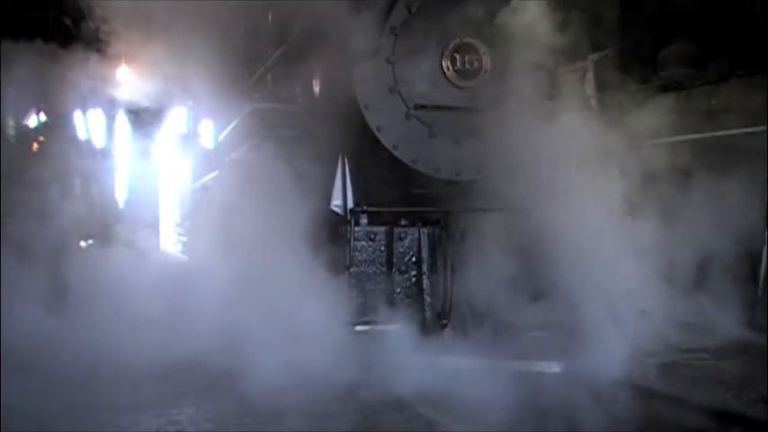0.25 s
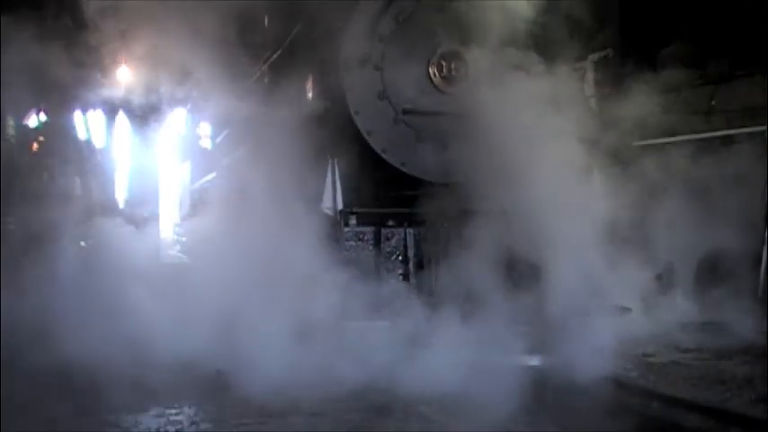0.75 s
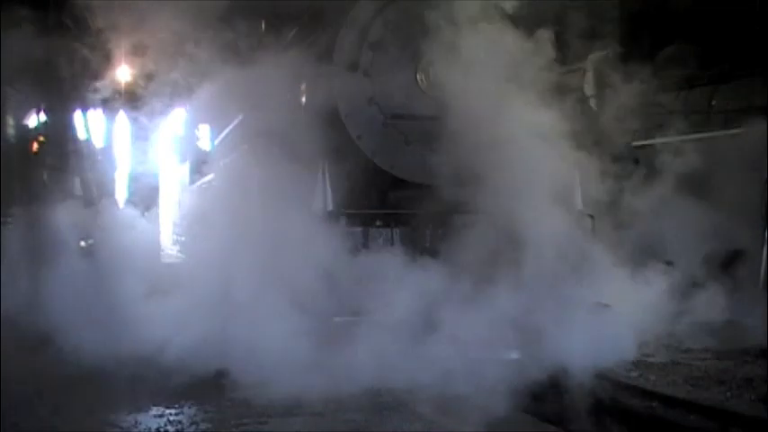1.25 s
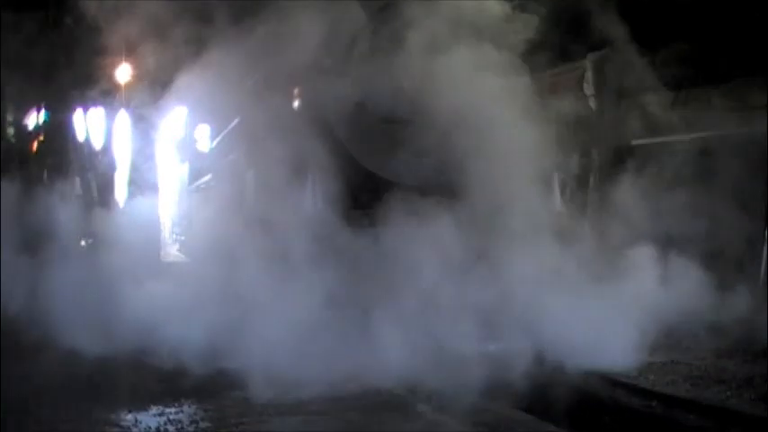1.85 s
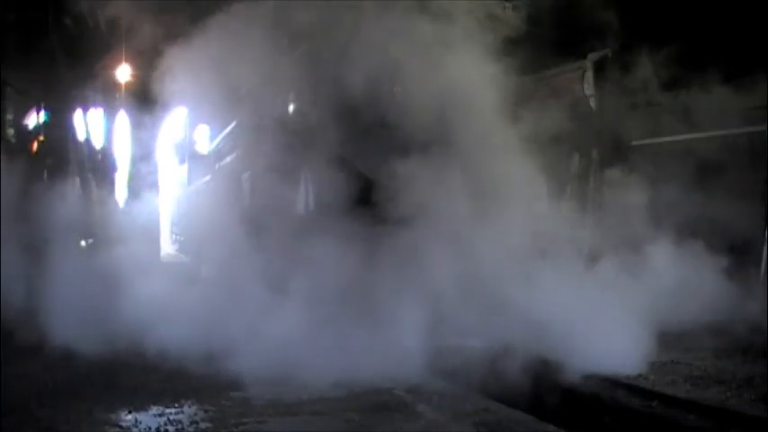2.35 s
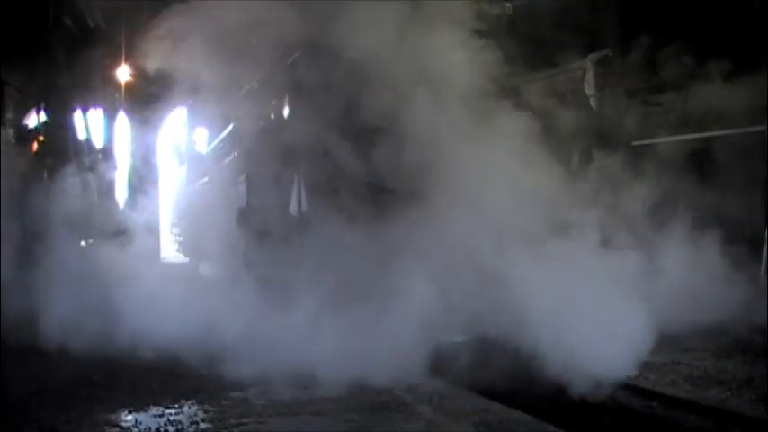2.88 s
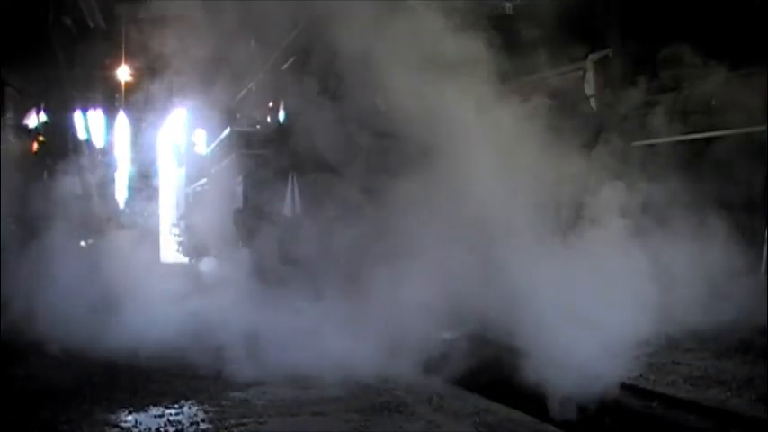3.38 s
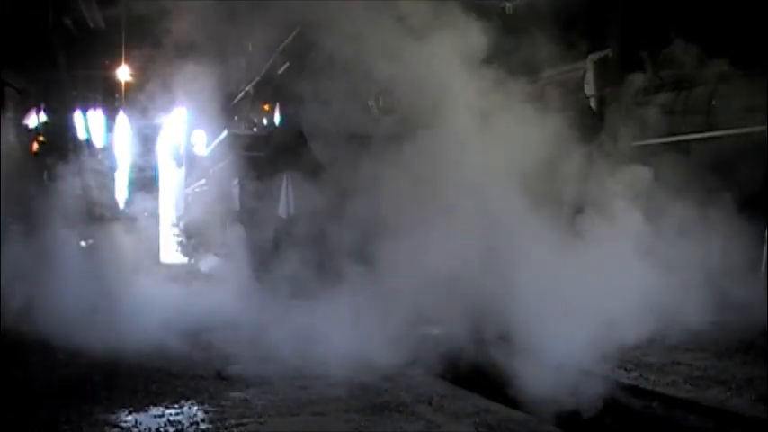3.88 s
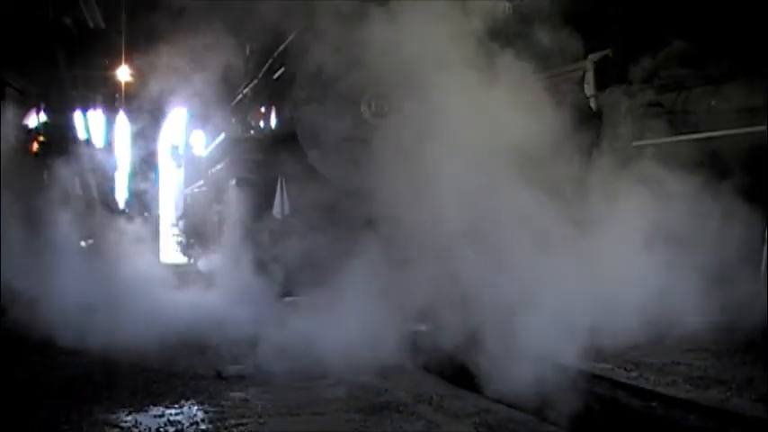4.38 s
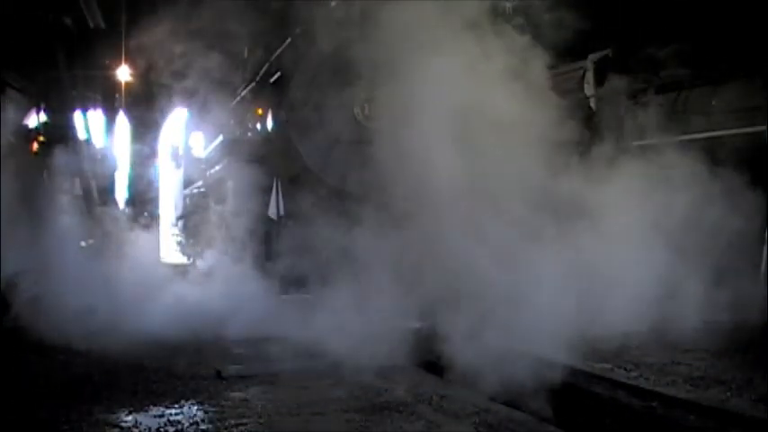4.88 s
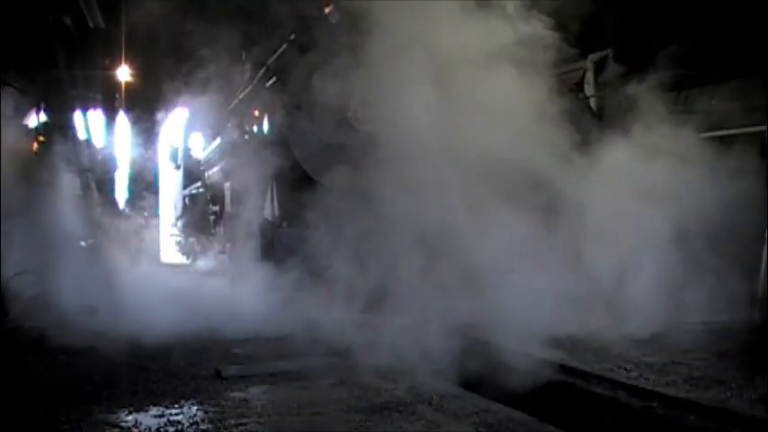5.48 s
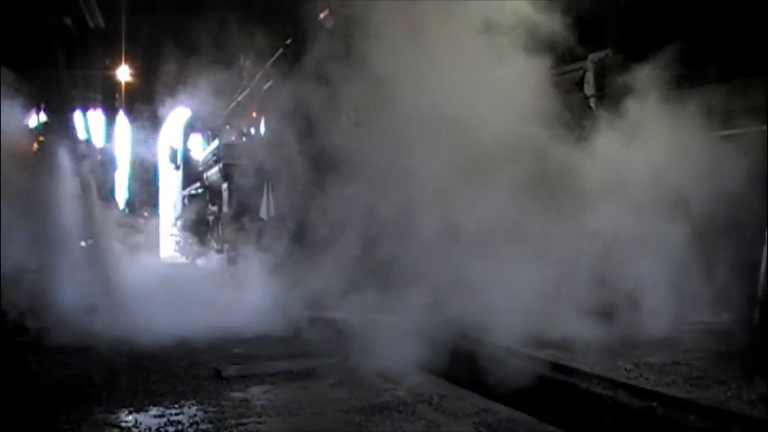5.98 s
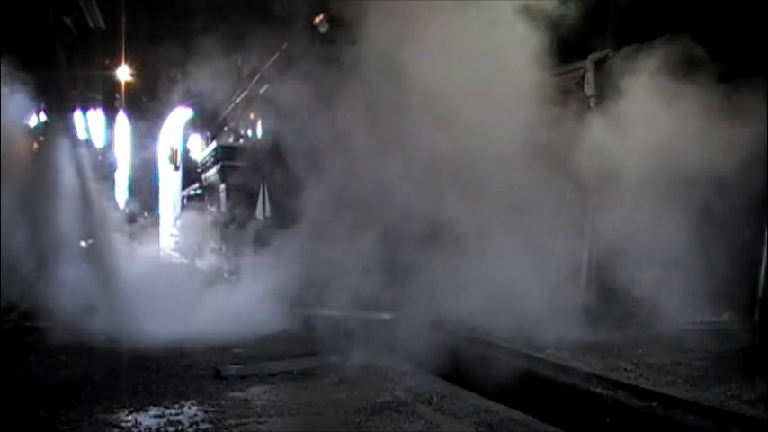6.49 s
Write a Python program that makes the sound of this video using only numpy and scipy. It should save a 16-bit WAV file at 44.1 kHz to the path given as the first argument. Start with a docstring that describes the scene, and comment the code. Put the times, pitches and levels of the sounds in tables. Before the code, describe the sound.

Loud steam hisses from a locomotive in a large hall, its rough squeal falling in pitch before the jet weakens and steel clinks twice.

```python
"""A steam locomotive blows off steam in a large engine hall. Its turbulent low roar narrows suddenly to
a bright jet, which feeds back on itself in a screech that slides down as the pressure falls.
Faint breathy tones come and go. The jet dies away over the hollow hum of a far draught, then
the roar swells a little. A soft thud sounds midway and a steel part clinks twice at the end."""
import sys
import numpy as np
from scipy import signal
from scipy.fft import rfft, irfft, next_fast_len
from scipy.io import wavfile
from scipy.ndimage import uniform_filter1d, map_coordinates

SR = 44100
rng = np.random.default_rng(int(sys.argv[2]) if len(sys.argv) > 2 else 0)


def dump(signal):
    """Clip the signal to [-1, 1] and save it as 16-bit WAV at the path in sys.argv[1]."""
    limited = np.clip(np.atleast_2d(signal).T, -1, 1)
    pcm = np.round(limited * 32767).astype(np.int16)
    wavfile.write(sys.argv[1], SR, pcm)


N = 297221

# Fader moves of the far draught. Each row: time in seconds, hum in dB, rumble in dB.
DRAUGHT_LEVELS = [(0.0, -27, -56), (0.38, -31.5, -56), (0.55, -55, -73), (1.3, -59, -77), (2.1, -44, -61),
                  (2.9, -42, -70), (3.4, -35, -60), (3.7, -32, -53), (4.7, -36.5, -57.5), (5.1, -34, -58.5),
                  (5.5, -32, -57), (5.9, -34.5, -59), (6.74, -32.5, -61)]
# Tone colours of the draught's two layers. Each row: frequency in Hz, level in dB.
HUM_EQ = [(100, -40), (170, -23), (250, -8.5), (400, -7.5), (555, -3), (580, -1), (606, 7.5), (640, -7),
          (685, 4.5), (745, -5.5), (1400, -12.5), (2500, -50)]
RUMBLE_EQ = [(20, -40), (50, -25), (75, 2), (95, -8), (125, -6), (160, 2), (220, -5), (400, -40)]
# Bands of breathy noise: a broad low roar at the opening, then faint wavering tones.
# Each row: start and end in seconds, centre in Hz, width in Hz, level in dB.
BREATH_BANDS = [(0.06, 0.47, 303, 240, -35), (.5, 3.09, 237, 46, -53.5), (3.39, 3.53, 1450, 70, -30),
                (0.06, .42, 800, 350, -30.5), (3.58, 3.7, 1470, 90, -34), (3.8, 3.98, 1300, 80, -37),
                (4.5, 5.05, 1400, 120, -41.5), (6.0, 6.18, 1460, 90, -35), (6, 6.4, 1390, 90, -33),
                (2.5, 5.2, 3650, 300, -40), (5.1, 7.2, 3660, 200, -44), (3.4, 4.4, 4550, 500, -36.5),
                (5.5, 6.2, 4250, 320, -43.5), (6.3, 6.55, 4250, 220, -44), (4.8, 5.35, 2320, 200, -39),
                (5.93, 6.12, 2280, 200, -40), (7, 6.3, 2420, 100, -42), (5.9, 6.4, 403, 100, -39)]
# The thud's two puffs. Each row: start in seconds, level in dB, pitch in Hz, 60 dB decay in seconds.
THUD_PUFFS = [(3.565, -40.5, 80, 0.4), (3.585, -27.5, 302, 0.7)]
# Two double hits on steel. Each row: start in seconds, level in dB, outer-mode trim in dB, knock in dB.
CLINK_HITS = [(6.606, -22.5, 1, -2), (6.622, -26, 2, -1), (6.7, -19, -9, -21), (6.725, -24, -13, -20)]
# The steel's modes, main ring first. Each row: pitch in Hz, level in dB, 60 dB decay in seconds.
STEEL_MODES = [(5130, -1, 0.075), (5080, -12, 0.22), (5300, -7, 0.04), (4880, -8, 0.05), (3880, -5, 0.04),
               (4120, -2, 0.07), (3680, -5, 0.05)]
# Fader moves of the jet. Each row: time in seconds, then roar, rush, hiss and fizz in dB.
JET_LEVELS = [(0.0, -22, -22, -27.5, -44), (0.08, -20.5, -21.5, -27, -42), (0.2, -20.5, -20.5, -23, -39),
              (0.35, -19, -20, -22.5, -37), (0.41, -22.5, -22.5, -17.5, -30),
              (0.48, -26.5, -25.5, -18, -33), (0.6, -26.5, -23.5, -19.5, -33),
              (0.9, -27.5, -25, -19.5, -34.5), (1.6, -28, -23.5, -19.5, -34.5),
              (2.05, -26, -24, -20.5, -41), (2.4, -24.5, -22.5, -20, -42), (3.05, -23.5, -21, -20, -36),
              (3.4, -24, -21.5, -23, -38), (3.8, -26, -25, -25.5, -38.5), (4.45, -28, -27, -26.5, -41),
              (5.25, -31.5, -33.5, -32.5, -48.5), (5.65, -30, -34.5, -32, -45),
              (5.88, -32.5, -34.5, -32, -46), (5.97, -28.5, -34.5, -33, -45),
              (6.74, -30.5, -35, -35.5, -50)]
# Tone colours of the jet's layers, dark to bright. Each row: frequency in Hz, level in dB.
ROAR_EQ = [(60, -60), (130, -30.5), (220, -13.5), (600, -2), (900, 0), (1500, 0.5), (2200, -1.5),
           (3200, -8.5), (5000, -36)]
RUSH_EQ = [(1200, -34), (2200, -6), (3000, -2.5), (4000, 0), (5200, 1), (6000, -2), (6800, -7.5),
           (9000, -44)]
HISS_EQ = [(4500, -47), (6300, -7.5), (7500, -2), (8800, -0.5), (10000, -3), (11000, -10), (12000, -16),
           (13500, -59)]
FIZZ_EQ = [(9500, -30), (11000, 1), (12000, 0), (13000, -2.5), (14000, -11), (14900, -31)]
# The screech leaps up as the jet narrows, then steps down as the pressure falls.
# Each row: time in seconds, pitch in Hz, level in dB, width in Hz.
SCREECH_PATH = [(0, 5090, -32, 250), (.15, 5100, -27, 180), (.2, 5210, -36, 400), (.26, 5250, -29, 200),
                (.34, 5240, -30, 250), (.385, 5480, -31, 400), (.4, 6100, -23, 150), (.43, 6180, -22, 200),
                (.46, 7500, -26, 1600), (.59, 7450, -21, 900), (.61, 7000, -42, 900), (.66, 6270, -33, 300),
                (.93, 5900, -36, 250), (.99, 5800, -28, 200), (1.05, 5700, -33, 251.5),
                (1.07, 5600, -25, 150.5), (1.13, 5600, -34, 199.5), (1.2, 5610, -22, 99.4),
                (1.27, 5600, -23, 100), (1.3, 5280, -29, 200.5), (1.36, 5350, -30, 299.6),
                (1.4, 5300, -35, 300), (1.45, 5250, -25, 350), (1.54, 5150, -32, 250),
                (1.6, 5200, -28, 200), (1.68, 5330, -27, 250), (1.73, 5130, -29, 200.3),
                (1.82, 5050, -26, 301), (1.91, 4930, -27, 250), (1.95, 4930, -37, 300),
                (2.02, 4880, -32, 299), (2.12, 4790, -27, 149.6), (2.18, 4740, -32, 249),
                (2.22, 4620, -31, 201.4), (2.32, 4610, -24.5, 150), (2.36, 4450, -33, 251),
                (2.44, 4380, -27, 250), (2.5, 4400, -26, 251), (2.53, 4090, -30, 200),
                (2.62, 4110, -29, 250), (2.7, 4100, -28, 199), (2.75, 4000, -29, 129.7),
                (2.8, 3980, -34, 200), (2.83, 3730, -30, 150.4), (2.87, 3720, -28, 130),
                (2.92, 3690, -37, 250), (3.02, 3730, -31, 198.6), (3.05, 3490, -29, 199.6),
                (3.11, 3450, -25, 149.8), (3.17, 3370, -35, 250), (3.24, 3290, -28, 200),
                (3.28, 3280, -33, 200), (3.31, 3080, -27, 100.3)]
# Stereo width of the hall. Each row: frequency in Hz, side against mid in dB.
HALL_WIDTH = [(60, -13), (350, -19), (1000, -13.5), (2500, -12.5), (5000, -10.5), (7200, -9.5), (8600, -3),
              (9600, -2), (11500, -4), (14000, -9)]
# Where the steam sits. Each row: time in seconds, left over right in dB, left lag in microseconds,
# scatter trim in dB.
STEAM_POSITION = [(0, -1, -6, 0), (.36, -1.5, -6, 0), (.45, -2, 19, -0.5), (1.4, -2, 18, 0.5),
                  (2.3, -2, 18, 0), (3.4, -1, 15, 1), (3.8, -0.5, 8, 0.5), (4.2, -0.5, 1, -2),
                  (4.6, -1, -2, 0), (6.74, -1.5, 3, 0.5)]
# Stereo tilt. Each row: frequency in Hz, left over right in dB, left phase lead in radians.
STEREO_TILT = [(60, -3, .3), (210, -2.5, 0.32), (500, -1.5, 0.36), (1150, 0.5, 0.3), (2700, 0.8, .01),
               (9500, 0.1, .01), (14500, 2, .01)]

CALM_SHARE, CALM_S = 0.4, 3.9  # the flutter left once the jet has slackened, and when
SCREECH_END_S, SCREECH_SIDE_DB = 3.35, -3
PITCH_WANDER, DROPOUT_DB = 0.005, 1.3  # raggedness of the screech's core; wander is a share of pitch
SKIRT_HZ, SKIRT_DB = 800, -3  # the squeal around the core: least width, level against the core
HALL_T60_S, HALL_DB = 0.25, -7
BREATH_HOLD_S = 0.15  # each breathy band's noise is evened out over this time
TOP_HZ = 15050


def amp(db):
    """Gain of a level in dB."""
    return 10 ** (np.asarray(db) / 20)


def unit(x):
    """Scaled to rms 1."""
    return x / np.sqrt(np.mean(x ** 2) + 1e-20)


def along(points, hz):
    """Read a curve of (Hz, value) points on a log frequency axis."""
    f, values = np.transpose(points)
    return np.interp(np.log(hz + 1), np.log(f + 1), values)


def curves(rows):
    """One automation curve for each column after the time."""
    times, *columns = np.transpose(rows)
    return [np.interp(np.arange(N) / SR, times, column) for column in columns]


def wobble(rate):
    """A smooth random curve, rate knots a second."""
    return map_coordinates(rng.standard_normal(int(N * rate / SR) + 4), [np.arange(N) * rate / SR])


def gate(start, end, fade):
    """Open between two times, with soft edges."""
    t = np.arange(N) / SR
    return np.clip(np.minimum(t - start, end - t) / fade, 0, 1)


def filtered(x, response):
    """Shape x with a gain given as a function of frequency."""
    size = next_fast_len(N + SR // 2)
    return irfft(rfft(x, size) * response(np.fft.rfftfreq(size, 1 / SR)), size)[..., :N]


def turbulence(eq, patchy_db):
    """Mid and side noise near rms 1; eddies make patches of random gain."""
    cells = signal.stft(rng.standard_normal((2, N)), nperseg=512)[2]
    eddies = uniform_filter1d(rng.standard_normal(cells.shape[1:]), size=8, axis=0)
    eddies = uniform_filter1d(eddies, size=12, axis=1)
    pair = signal.istft(cells * amp(patchy_db * unit(eddies)), nperseg=512)[1][:, :N]
    pair = filtered(pair, lambda hz: amp(along(eq, hz)))
    return pair / np.std(pair[0])


def pitched_noise(hz, width_hz, steady):
    """Mid and side bands of noise around a moving pitch, with a share of steady tone."""
    tone = np.exp(2j * np.pi * np.cumsum(hz) / SR)
    knots = np.cumsum(np.abs(width_hz)) / SR  # the wider the band, the faster its envelope wanders
    draw = lambda: map_coordinates(rng.standard_normal(N // 20), [knots % (N // 20 - 4)])
    return np.array([unit(((steady + draw() + 1j * draw()) * tone).real) for _ in range(2)])


def puff(low_hz, high_hz, samples):
    """A short stretch of band-passed noise at rms 1."""
    band = signal.butter(2, [low_hz, high_hz], "band", fs=SR, output="sos")
    return unit(signal.sosfilt(band, rng.standard_normal(samples)))


def far_draught():
    """A far draught hums hollowly and unevenly over a low rumble that comes in lumps."""
    hum_db, rumble_db = curves(DRAUGHT_LEVELS)
    hum = amp(hum_db + 0.69 * wobble(6)) * turbulence(HUM_EQ, patchy_db=0.8)
    rumble = amp(rumble_db + 3.1 * wobble(9.7)) * turbulence(RUMBLE_EQ, patchy_db=-0.5)
    return hum + rumble


def breath_bands():
    """Bands of breathy noise: a broad low roar at the opening, then faint wavering tones."""
    size = next_fast_len(N)
    breath = rfft(rng.standard_normal((2, size)))
    f = np.fft.rfftfreq(size, 1 / SR)
    out = np.zeros((2, N))
    for start, end, hz, width_hz, db in BREATH_BANDS:
        band = irfft(breath * np.exp(-(2 * (f - hz) / width_hz) ** 2), size)[:, :N]
        power = np.abs(uniform_filter1d(band ** 2, size=round(BREATH_HOLD_S * SR)))
        out += gate(start, end, fade=0.059) * amp(db + wobble(5.5)) * band / np.sqrt(power + 1e-20)
    return out


def thud():
    """Two low puffs of noise with a soft attack blend into one thud."""
    out, t = np.zeros(N + SR), np.arange(SR // 3) / SR
    for start, db, hz, t60 in THUD_PUFFS:
        envelope = amp(db - 60 * t / t60) * (1 - np.exp(-t / 0.0076))
        out[round(start * SR):][:len(t)] += envelope * puff(hz / 1.25, hz * 1.74, len(t))
    return out[:N]


def clinks():
    """Each hit rings the steel roughly over a short dull knock."""
    out, t = np.zeros(N + SR), np.arange(SR // 3) / SR
    main_hz = STEEL_MODES[0][0]
    attack = 1 - np.exp(-t / 0.0013)
    for start, db, outer_db, knock_db in CLINK_HITS:
        ring = np.zeros(len(t))
        for hz, mode_db, t60 in STEEL_MODES:
            trim_db = outer_db if abs(hz - main_hz) > 120 else 0
            rough_phase = np.cumsum(rng.normal(0, 0.09, len(t)))
            ring += amp(mode_db + trim_db - 60 * t / t60) * np.sin(2 * np.pi * hz * t + rough_phase)
        knock = amp(knock_db - 60 * t / 0.093) * puff(730, 2100, len(t))
        out[round(start * SR):][:len(t)] += amp(db) * (ring * attack + knock)
    return out[:N]


def screech():
    """The jet feeds back on itself: a thin ragged core in a broad squeal; the hall lets it hang on."""
    hz, db, width_hz = curves(SCREECH_PATH)
    core_gain = amp(db + DROPOUT_DB * wobble(21.89))
    core = core_gain * pitched_noise(hz * (1 + PITCH_WANDER * wobble(25)), width_hz, steady=0.05)
    skirt_gain = amp(uniform_filter1d(db, size=SR // 5) + SKIRT_DB)
    skirt = skirt_gain * pitched_noise(hz, np.maximum(width_hz, SKIRT_HZ), steady=0)
    direct = gate(0, SCREECH_END_S, fade=0.025) * (core + skirt)
    tail = rng.standard_normal((2, SR)) * amp(-60 * np.arange(SR) / SR / HALL_T60_S)
    reverb = signal.fftconvolve(direct[:1], tail / np.linalg.norm(tail[0]), axes=1)[:, :N]
    return (direct + amp(HALL_DB) * reverb) * amp([[0], [SCREECH_SIDE_DB]])


def steam_jet():
    """Roar, rush, hiss and fizz of the escaping steam; slugs of water make the flow flutter."""
    roar_db, rush_db, hiss_db, fizz_db = curves(JET_LEVELS)
    flutter = wobble(9) * (CALM_SHARE + (1 - CALM_SHARE) * gate(-1, CALM_S, fade=0.5))
    roar = amp(roar_db + 0.46 * flutter) * turbulence(ROAR_EQ, patchy_db=1.0)
    rush = amp(rush_db + 0.5 * flutter + 0.8 * wobble(4.86)) * turbulence(RUSH_EQ, patchy_db=0.9)
    hiss = amp(hiss_db + 0.56 * flutter + 0.6 * wobble(20)) * turbulence(HISS_EQ, patchy_db=0.9)
    fizz = amp(fizz_db + 1.5 * flutter + 0.54 * wobble(10)) * turbulence(FIZZ_EQ, patchy_db=1.0)
    return roar + rush + hiss + fizz


def scene():
    """The mix: the hall scatters the steam wide, while the thud and clinks sit in the centre."""
    mid, side = steam_jet() + screech() + breath_bands() + far_draught()
    pan_db, lag_us, scatter_db = curves(STEAM_POSITION)
    side = amp(scatter_db) * filtered(side, lambda hz: amp(along(HALL_WIDTH, hz)))
    side -= lag_us * 1e-6 * SR / 2 * np.gradient(mid)  # a share of the slope acts as a tiny delay
    left = amp(pan_db / 2) * (mid + side)
    right = amp(-pan_db / 2) * (mid - side)
    return np.array([left, right]) + thud() + clinks()


def record(dry):
    """Tilt left and right apart in colour and phase, and cut the very top."""
    balance_db = [(hz, db) for hz, db, _ in STEREO_TILT]
    phase_lead = [(hz, radians) for hz, _, radians in STEREO_TILT]
    halves = np.array([[0.5], [-0.5]])  # each channel takes half the tilt, in opposite directions
    tilt = lambda hz: amp(along(balance_db, hz)) * np.exp(1j * along(phase_lead, hz))
    return filtered(dry, lambda hz: tilt(hz) ** halves * (hz < TOP_HZ))


dry = scene()
out = record(dry)
dump(out)
```